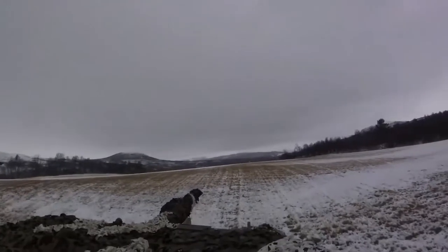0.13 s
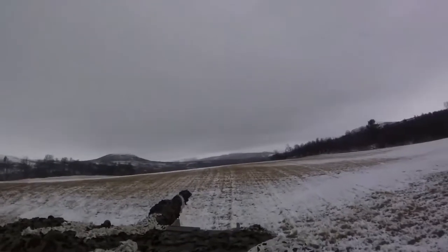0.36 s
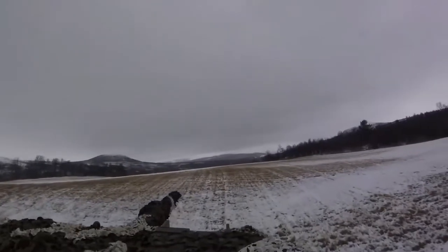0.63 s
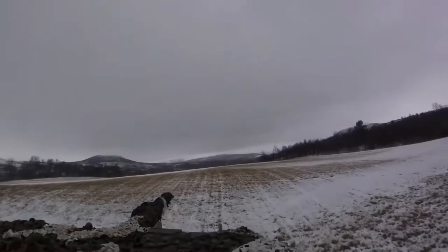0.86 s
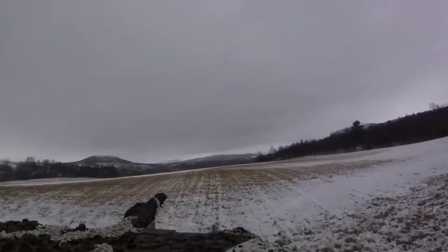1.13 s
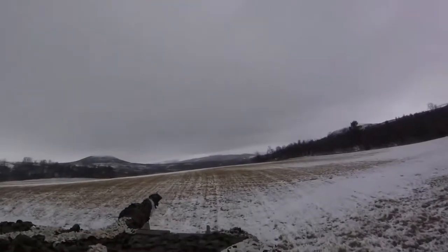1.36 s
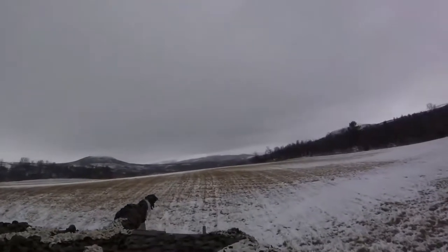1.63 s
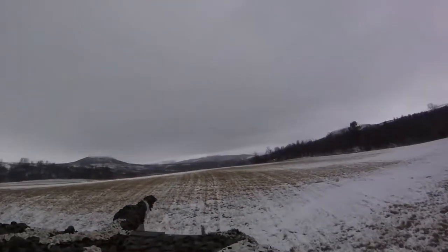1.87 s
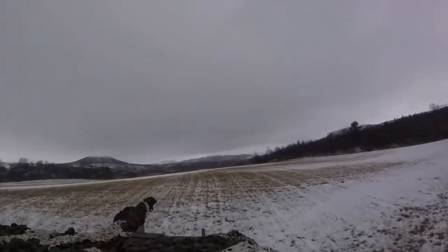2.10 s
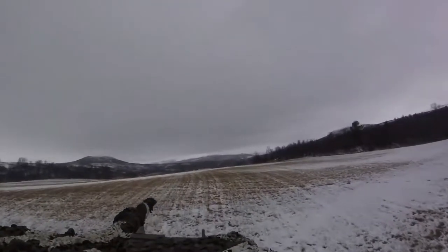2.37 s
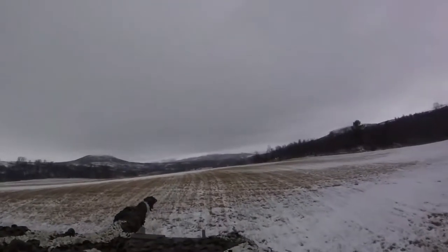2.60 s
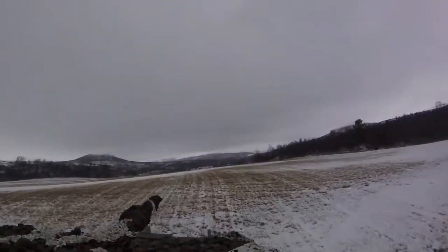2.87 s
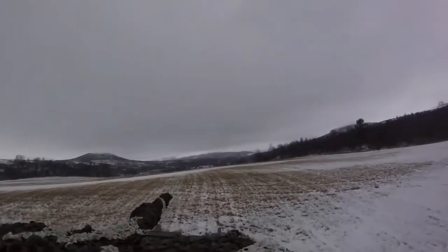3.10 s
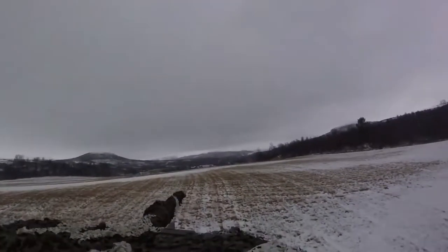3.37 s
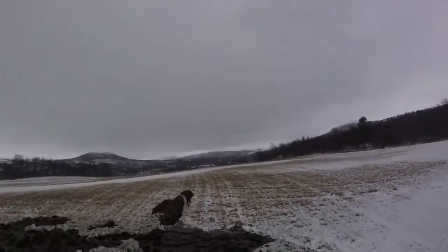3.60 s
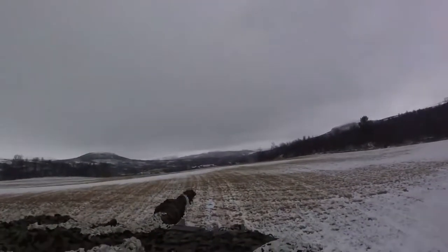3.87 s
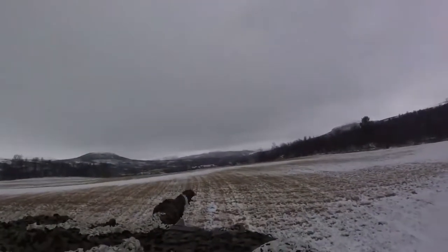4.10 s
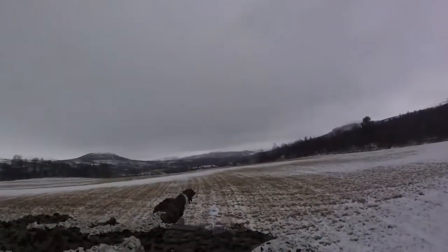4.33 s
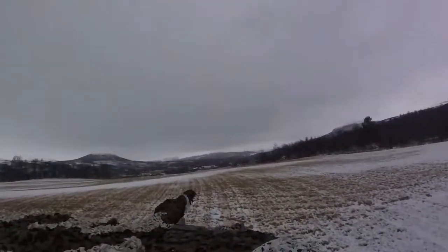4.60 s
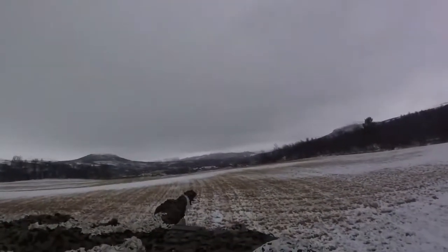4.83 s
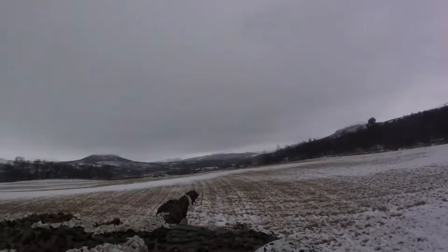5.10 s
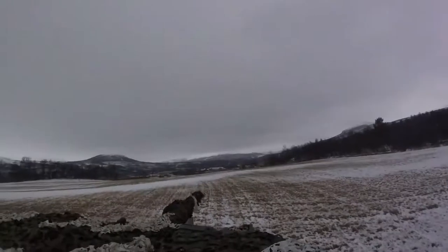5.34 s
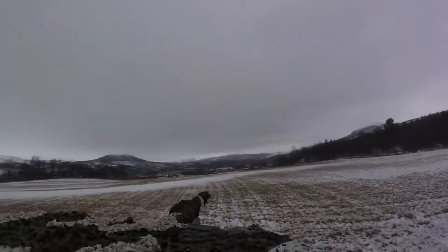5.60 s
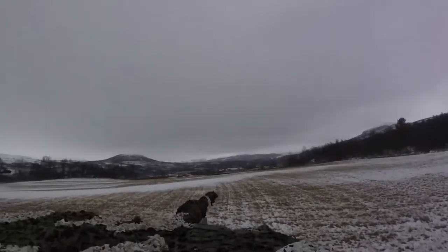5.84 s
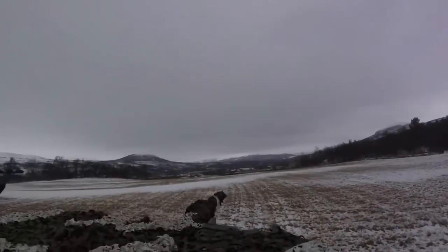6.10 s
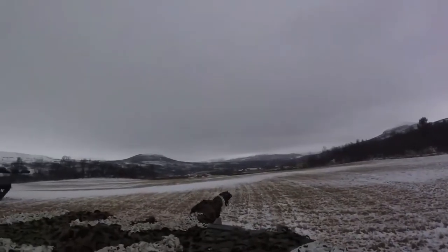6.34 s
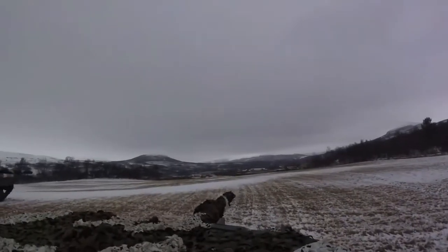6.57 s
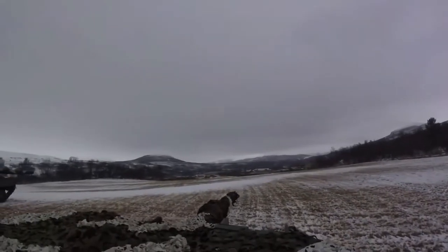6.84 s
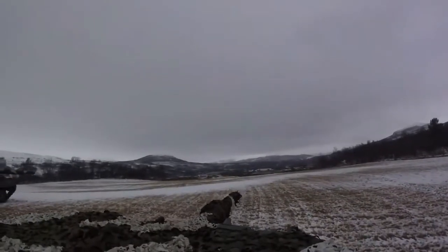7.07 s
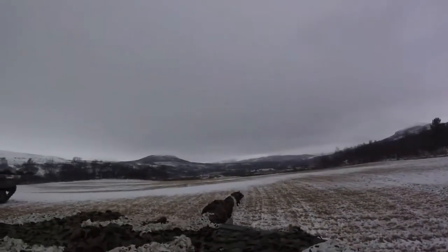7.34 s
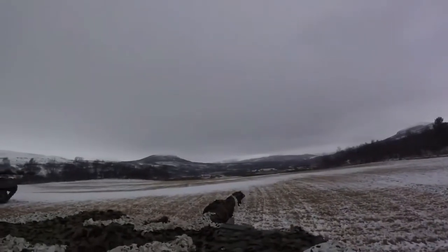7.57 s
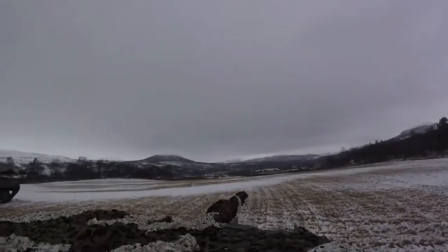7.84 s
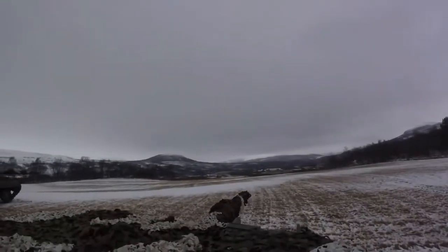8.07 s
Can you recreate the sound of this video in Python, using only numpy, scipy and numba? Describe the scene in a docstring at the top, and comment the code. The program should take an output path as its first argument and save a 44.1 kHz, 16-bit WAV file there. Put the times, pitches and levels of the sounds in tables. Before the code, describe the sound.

Heavy tracked vehicles with big diesels growl across a snowy field, engines revving and sinking, exhaust puffing, tracks rumbling, rattling and clanking.

```python
"""Tracked vehicles manoeuvring

Three tracked vehicles with six-cylinder diesels manoeuvre on a field, heard at one microphone.
Their firing tones are sines that glide and beat; the near engine puffs shaped noise at each firing under throttle.
Tracks rumble, roar and rattle as coloured noise, with clanks as noise bursts and thuds as damped sines.
Gears, rings and a turbocharger are wavering tones. A gain control and a limiter steady the level."""
import sys
import numpy as np
from scipy import signal
from scipy.fft import rfft, irfft, next_fast_len
from scipy.io import wavfile
from scipy.ndimage import uniform_filter1d
from numba import njit

SR = 44100
rng = np.random.default_rng(int(sys.argv[2]) if len(sys.argv) > 2 else 0)


def gain_from_db(level_db):
    """Convert decibel levels to linear amplitude factors (20 dB per decade)."""
    decades = np.asarray(level_db, float) / 20
    return 10 ** decades


def generate_wav(signal):
    """Clip the signal to [-1, 1] and save it as 16-bit WAV at the path in sys.argv[1]."""
    frames = np.transpose(np.atleast_2d(signal))
    scaled = np.clip(frames, -1, 1) * 32767
    pcm = np.round(scaled).astype(np.int16)
    wavfile.write(sys.argv[1], SR, pcm)


N = 361617  # samples, 8.2 s
STEP = 16  # engines hold only low tones: made at every 16th sample

# All levels are ahead of the gain control.
# Tracks on the ground. Each row: time in seconds, then work of the links, shaking of the hulls
# and grit under the links, all in dB about their means.
TRACK_WORK = [(0.0, 3, 3.5, 1), (0.3, 0, 0, 3), (0.65, -1, 0, 0), (1.0, 3, -2.5, -1.5), (1.55, 1, 7, -4),
              (2.25, 0.5, -4.5, 2), (2.6, -4, 0, 1.5), (3.05, -4.5, 0.5, -1.5), (3.55, -2, 0.5, -1),
              (3.9, 0, 3, 1), (4.4, 2, 3.5, -1), (5.1, 0, 1, 1.5), (6.0, -0.5, -0.5, -0.5),
              (6.5, 0, 0.5, 2), (7.0, 2, 1, -3.5), (7.5, 0, 3, -1), (7.9, 1.5, 4, -5.5), (8.2, 1, 3, -1)]
# Spectra of the track layers. Each row: frequency in Hz, relative density in dB per Hz.
RUMBLE_SPECTRUM = [(12, -35), (22, -12), (35, -4), (50, -1), (72, 0), (95, -2), (120, -10), (160, -30),
                   (260, -60)]
GRUMBLE_SPECTRUM = [(60, -41), (110, 7.5), (150, 5), (220, 3.5), (280, -3.5), (350, -13), (480, -31),
                    (700, -62.5)]
ROAR_SPECTRUM = [(190, -28.5), (330, -1), (387, -3.5), (527, -7), (556, -8.5), (606, -6.5), (647, -7.5),
                 (749, -8), (937, -15), (1300, -12.5), (1600, -20.5), (2080, -51.5), (3520, -120)]
GRIT_SPECTRUM = [(940, -30), (1600, -1.5), (1760, -1), (1960, -2.5), (2300, -7.5), (2820, -7.5),
                 (3900, -19.5), (5070, -52), (8580, -120)]
RATTLE_SPECTRUM = [(3000, -30), (3700, -8), (4450, -7), (4900, -1), (5250, 1), (5850, -8), (6550, -3),
                   (7300, -7), (8600, -8), (9600, -13), (11000, -22), (12000, -29), (14000, -34),
                   (15000, -50)]  # treble as coloured by the camera's housing
# Edges of the bands that swell alone, in Hz: for the treble noises, then for the grit.
PATCH_EDGES_HZ = [0, 4400, 5900, 7000, 8000, 9200, 23000]
GRIT_EDGES_HZ = [0, 1150, 1450, 1800, 2250, 2800, 3400, 23000]
RUMBLE_DB, GRUMBLE_DB, ROAR_DB, GRIT_DB, RATTLE_DB = -31.5, -33.5, -42, -54, -63  # at mean work
ROAR_SHARE, GRIT_SHARE, RATTLE_SHARE = 0.82, 1.16, 0.9  # dB for each dB of work
RUMBLE_SHARE = 0.93  # dB for each dB of shaking

# Louder knocks of the links; the last three rows are soft, longer swells of treble noise.
# Each row: start in seconds, level in dB ahead of the envelope, decay constant in seconds.
CLANKS = [(2.629, -67, 0.0083), (2.774, -54.5, 0.0089), (2.97, -53.5, .004), (3.07, -62, .006),
          (3.147, -60, .006), (3.181, -56, 0.0045), (3.232, -59.5, .015), (3.346, -54, .006),
          (3.422, -60, .005), (3.742, -56, 0.015), (3.974, -56, .008), (4.455, -57, .03),
          (4.478, -55, .014), (4.587, -58, .012), (4.716, -53, .008), (4.778, -53, 0.014),
          (4.795, -56.5, .016), (4.893, -53.5, .005), (4.913, -59, .012), (5.4816, -63, .012),
          (5.78, -53.5, .008), (6.139, -59, 0.0067), (6.27, -58.5, 0.013), (6.387, -56, .008),
          (7.164, -61, .014), (7.72, -60.5, .04), (7.78, -64, .04), (7.87, -62, .04)]
# Dull knocks as a hull jolts. Each row: start in seconds, level in dB ahead of onset and decay, pitch in Hz.
THUDS = [(3.32, -29, 382), (3.761, -22, 149.8), (3.955, -22, 292), (4.12, -13.5, 146), (4.615, -33, 522.5),
         (4.62, -40, 941), (4.919, -22, 145), (5.699, -15, 164.4), (7.62, -18, 114.1), (7.88, -16.5, 172),
         (7.93, -17.5, 134.7), (8.08, -24, 111)]
THUD_T60_S = 0.13

# Wavering tones: rings of hull, plate and links, the turbocharger, then three gear whines.
# Each row: time in seconds, mean pitch in Hz, level in dB ahead of flicker.
HULL_RING = [(4.1, 743.4, -70), (4.6, 761.4, -52), (5.2, 754, -70), (6.2, 747.8, -60.5), (7, 753, -56),
             (7.9, 756, -53.5), (8.2, 744, -65)]
PLATE_RING = [(6.0, 1290, -71), (6.4, 1295, -57), (6.7, 1310, -56), (7.1, 1298, -62), (7.5, 1313, -58.5),
              (8.2, 1290, -63)]
LINK_RING = [(2.9, 2770, -72), (3.3, 2766, -72.5), (8.2, 2753, -70)]
TURBO = [(1.3, 7303, -72), (1.7, 7670, -71), (2, 7900, -66), (2.3, 8270, -67), (2.5, 8420, -84),
         (2.75, 8350, -79), (2.95, 8100, -77.5), (3.2, 7900, -78.5), (3.4, 7570, -77), (3.55, 7300, -83)]
WHINE = [(3.0, 568.5, -57), (3.8, 557.3, -58), (4.2, 568.7, -47.5), (4.6, 588, -52), (5.1, 595, -64),
         (5.4, 599, -56), (5.8, 600.6, -51), (6.6, 598.2, -51), (7.0, 612, -52.5), (8.2, 613.2, -51.5)]
RISING_WHINE = [(4.8, 824, -59), (5.3, 851.7, -57), (5.7, 880, -57), (6.2, 896.5, -56), (6.35, 902, -70)]
LATE_WHINE = [(6.7, 1102, -66), (6.95, 1115, -59), (7.3, 1122, -58), (7.55, 1115, -60), (8.2, 1110, -61)]

# Engine glides. Each row: time in seconds, firing rate in Hz, firing tone in dB ahead of roughness.
FAR = [(0.0, 102.1, -28), (0.38, 101.8, -27.5), (0.75, 98.85, -25.5), (1.12, 92.5, -32), (1.5, 92.2, -33.5),
       (2.71, 73.45, -39.5), (3.11, 81.1, -43), (3.32, 85.33, -33.5), (3.52, 84.7, -28.5),
       (3.93, 87.45, -27), (4.54, 94.3, -26.5), (5.2, 100.5, -24.5), (6.3, 101.6, -24), (6.57, 99.8, -25),
       (6.78, 93.7, -29), (7.39, 82.58, -26), (7.79, 71.14, -30), (8.0, 72.4, -22), (8.2, 69.86, -34)]
LEAD = [(0.0, 61.7, -36), (0.2, 55.95, -38), (0.6, 51.75, -30), (0.8, 57.1, -24), (1.0, 65.98, -16.5),
        (1.4, 81.2, -22), (1.8, 92, -21.5), (2.4, 101.5, -19), (2.8, 106.6, -20.5), (3.0, 99.44, -19),
        (3.2, 83.86, -28.5), (3.47, 72.9, -30), (3.58, 68.93, -29), (3.7, 60, -43), (3.76, 58.23, -25),
        (3.86, 65.9, -22), (4.0, 57.9, -22.5), (4.2, 57.54, -26), (4.42, 62.33, -21), (4.8, 60.45, -22.5),
        (5.3, 58.72, -22), (5.7, 58.5, -21), (6.0, 57.3, -21.5), (6.27, 53.2, -22.5), (6.55, 52.6, -24.5),
        (6.8, 52.53, -21.5), (7.05, 54.3, -22), (7.4, 53.4, -21.5), (7.6, 52.63, -23.5), (7.8, 49.08, -24),
        (8.2, 54.3, -20)]
NEAR = [(0.0, 65.2, -25.5), (0.2, 66.15, -24), (0.39, 78.24, -22), (0.59, 81.6, -20.5), (0.79, 69.76, -28),
        (0.98, 64.5, -30), (1.18, 71.5, -33.5), (1.37, 73.5, -22.5), (1.6, 80.7, -30), (1.8, 86.5, -27),
        (1.96, 89.13, -30), (2.13, 91.47, -25), (2.36, 93.4, -25), (2.55, 89.53, -34.5), (2.75, 84, -49)]
# Exhaust bark of each engine. Each row: multiple of the six-firing cycle, relative level in dB.
FAR_BARK = [(8, -11.5), (9, -6), (11, -16), (12, -4.5), (14, -17.5), (15, -17), (20, -15.5)]
LEAD_BARK = [(8, -13), (9, -7.5), (11, -16), (12, -1.5), (14, -13), (15, -5.5), (18, -24.5), (20, -14),
             (21, -23), (22, -22), (26, -24)]
NEAR_BARK = [(8, -9.5), (9, -1.5), (12, 3), (14, -12.5), (15, 1.5), (18, -11), (20, -18)]
# Exhaust resonances. Each row: centre in Hz, width in Hz, boost in dB.
PIPE = [(238, 23, 7), (344, 63, 4)]
BARK_DB_PER_HZ, CRUISE_HZ = 0.1486, 77.8  # the bark grows with firing rate
# Coasting, from and to in seconds: the bark may drop quickly; the half-rate tone changes later,
# by each engine's amounts.
FAR_COASTS, LEAD_COASTS, NEAR_COASTS = (7.15, 7.68), (2.956, 3.67), (0.49, 0.67)
COAST_FADE_S, HALF_LAG_S = 0.17, 0.21

# Near engine's throttle. Each row: opens in seconds, shuts in seconds, gas roar in dB ahead of build-up,
# fade after shutting in dB per second.
THROTTLE = [(-0.3, 0.153, -45.5, 41), (0.198, 0.513, -39.5, 111), (0.9, 1.239, -45.5, 50.5),
            (1.406, 2.284, -41, 23)]
# Spectra of the exhaust gas. Each row: frequency in Hz, relative density in dB per Hz.
GAS_ROAR_SPECTRUM = [(220, 1.5), (380, 0), (625, 1.5), (682, -6.5), (766, 0.5), (887, -15.5), (1610, -26),
                     (1930, -22), (3900, -30), (5070, -62.5), (8580, -120)]
GAS_HISS_SPECTRUM = [(3000, -30), (3700, -8), (4450, -9), (4900, -2), (5250, 1), (5850, -9), (6200, -5),
                     (6450, -1), (6800, -4), (7200, -8), (8600, -11), (9800, -18), (11300, -36),
                     (12500, -42), (14000, -42), (15000, -50)]
OPEN_S, BUILD_DB_PER_S = 0.051, 6  # opening time; pressure builds while open
GAS_HISS_DB, HISS_FADE_MORE_DB_PER_S = -16.5, 27.5  # hiss against roar

HOLD_DB, RATIO, ATTACK_S, RELEASE_S = -17.5, 1.39, 0.022, 0.018  # gain control
CEILING_DB, CEILING_RATIO, CEILING_ATTACK_S, CEILING_RELEASE_S = -14, 2.5, 0.003, 0.035  # quick limiter


def noise():
    """White noise at rms 1."""
    return rng.standard_normal(N)


def walk(rate, step=1):
    """Random levels held 1 / rate s and slewed twice, at every step-th sample; spread near 1."""
    hold = int(SR / STEP / rate)
    held = np.repeat(rng.standard_normal(N // STEP // hold + 2), hold)
    slow = uniform_filter1d(uniform_filter1d(held, hold), hold)
    return np.repeat(1.312 * slow, STEP // step)[:-(-N // step)]


def curves(table):
    """Columns of a table, glided to every sample."""
    s, *columns = np.transpose(table)
    return [np.interp(np.arange(N) / SR, s, column) for column in columns]


def ends(table, fade_s=0.15):
    """Fades in ahead of the first row and out after the last."""
    t = np.arange(N) / SR
    inside_s = np.minimum(t - table[0][0], table[-1][0] - t)
    return np.clip(1 + inside_s / fade_s, 0, 1)


def colour(x, spectrum):
    """Filters x by the spectrum and brings it to rms 1."""
    hz, db = np.transpose(spectrum)
    size = next_fast_len(N)
    f = np.arange(size // 2 + 1) * SR / size + 1
    gain = gain_from_db(np.interp(np.log(f), np.log(hz), db, left=-200, right=-200))
    y = irfft(rfft(x, size) * gain, size)[:N]
    return y / np.std(y)


def patchy(x, edges, patchy_db, rate):
    """Each band swells and sinks alone."""
    size = next_fast_len(N)
    spectrum = rfft(x, size)
    band = np.digitize(np.arange(size // 2 + 1) * SR / size, edges)
    out = np.zeros(N)
    for k in range(1, len(edges)):
        out += gain_from_db(patchy_db * walk(rate)) * irfft(spectrum * (band == k), size)[:N]
    return out


def tone(table, waver_hz, rate, flicker_db, octave_db=-40):
    """A tone whose pitch and level waver; quick wide wavering makes it a narrow hiss."""
    hz, db = curves(table)
    phase = 2 * np.pi * np.cumsum(hz + waver_hz * walk(rate)) / SR
    wave = np.sin(phase) + gain_from_db(octave_db) * np.sin(2 * phase)
    return np.sqrt(2) * gain_from_db(db + flicker_db * walk(rate)) * wave * ends(table)


def tracks():
    """Ground and hulls rumble as low noise; links roar and rattle in bursts, with random strikes among them."""
    work_db, shaking_db, grit_db = curves(TRACK_WORK)
    shake = walk(11)
    # about 300 strikes a second, of widely spread size, each a short decaying burst
    strikes = (rng.random(N) < 300 / SR) * gain_from_db(1.4 * rng.exponential(size=N)) * noise()
    burst = np.exp(-np.arange(200) / 45) * rng.standard_normal(200)
    clicks = signal.fftconvolve(strikes, burst, "same")
    clicks /= np.std(clicks)

    rumble = colour(gain_from_db(0.6 * walk(3.8)) * noise(), RUMBLE_SPECTRUM)
    grumble = colour(gain_from_db(1.2 * walk(9)) * noise(), GRUMBLE_SPECTRUM)
    roar = colour(gain_from_db(0.13 * shake + 0.45 * walk(25)) * noise(), ROAR_SPECTRUM)
    grit = colour(gain_from_db(0.5 * shake + 0.7 * walk(13)) * noise() + 0.3 * clicks, GRIT_SPECTRUM)
    grit = patchy(grit, GRIT_EDGES_HZ, patchy_db=1.5, rate=6)
    rattle = colour(gain_from_db(shake + 0.7 * walk(40)) * noise() + 0.089 * clicks, RATTLE_SPECTRUM)
    rattle = patchy(rattle, PATCH_EDGES_HZ, patchy_db=1.13, rate=9)

    out = gain_from_db(RUMBLE_DB + RUMBLE_SHARE * shaking_db) * rumble
    out += gain_from_db(GRUMBLE_DB + shaking_db) * grumble
    out += gain_from_db(ROAR_DB + ROAR_SHARE * work_db) * roar
    out += gain_from_db(GRIT_DB + GRIT_SHARE * work_db + grit_db) * grit
    return out + gain_from_db(RATTLE_DB + RATTLE_SHARE * work_db) * rattle


def clanks():
    """Knocks of the links and soft late swells: decaying noise with the rattle's colour and some body below."""
    body = colour(noise(), [(800, -29), (1800, -3.5), (3500, 3.5), (5000, -34)])
    clang = colour(noise(), RATTLE_SPECTRUM) + body
    # even out the noise, so that each burst follows its row
    clang /= np.sqrt(uniform_filter1d(clang ** 2, size=90) / 2 + 1e-9)
    u, shape = np.arange(8000) / SR, np.zeros(N)
    for s, db, decay_s in CLANKS:
        i = int(s * SR)
        envelope = gain_from_db(db) * np.minimum(u / 0.003, 1) * np.exp(-u / decay_s)
        shape[i:i + 8000] += envelope[:N - i]
    return shape * clang


def thuds():
    """Each jolt of a hull rings one damped mode after a soft onset."""
    out, u = np.zeros(N + SR), np.arange(SR // 2) / SR
    for s, db, hz in THUDS:
        onset = (1 - np.exp(-u / 0.0022)) ** 2
        ring = gain_from_db(db - 60 * u / THUD_T60_S) * onset * np.sin(2 * np.pi * hz * u)
        out[int(s * SR):][:len(u)] += ring
    return out[:N]


def rings():
    """Hull, plate and links ring as tones of wavering pitch and level."""
    hull = tone(HULL_RING, 9.05, 25, 3.1)
    plate = tone(PLATE_RING, 14, 30, 2.5)
    links = tone(LINK_RING, 60, 150, 2.7)
    return hull + plate + links


def turbocharger():
    """A breathy whistle: quick, wide pitch wavering spreads the tone into a narrow hiss."""
    return tone(TURBO, 180, 300, 2.6)


def gears():
    """Three thin gear tones, the first with a stronger octave above."""
    first = tone(WHINE, 1.2, 10, 0.81, octave_db=-12.5)
    rising = tone(RISING_WHINE, 1.5, 11, 1.2)
    late = tone(LATE_WHINE, 2.5, 10, 1.8)
    return first + rising + late


def turns(table):
    """Phase in six-firing cycles, summed from the firing rate."""
    return np.cumsum(curves(table)[0]) / SR / 6


def engine(table, bark, rough_db, wobble_rad, coasts, half_db, half_coast_db, bark_db, hush_db, dulls_db_per_s=0):
    """Multiples of the cycle; uneven firing makes each waver; a pipe turning away dulls the higher ones."""
    hz, firing_db = (c[::STEP] for c in curves(table))
    t = np.arange(len(hz)) * STEP / SR

    def span(start, stop):
        """Is 1 between start and stop, with a fade at either side."""
        return np.clip(1 + np.minimum(t - start, stop - t) / COAST_FADE_S, 0, 1)

    late_coast = span(coasts[0] + HALF_LAG_S, coasts[1])
    half_db = half_db + half_coast_db * late_coast
    bark_db = firing_db + bark_db + BARK_DB_PER_HZ * (hz - CRUISE_HZ) - hush_db * span(*coasts)
    cycle = 2 * np.pi * turns(table)[::STEP]
    out = gain_from_db(firing_db + rough_db * walk(9, STEP)) * np.sin(6 * cycle)
    # tone at half the firing rate, its level steadier late in the coasting
    half_waver_db = (1 - 0.7 * late_coast) * 4 * walk(5, STEP)
    out += gain_from_db(half_db + half_waver_db) * np.sin(3 * cycle + rng.uniform(0, 2 * np.pi))
    for order, db in bark:
        f = hz * order / 6
        pipe_db = sum(top / (1 + (2 * (f - centre) / width) ** 2) for centre, width, top in PIPE)
        pipe_db -= dulls_db_per_s * t * max(order / 3 - 3, 0)
        wobble = wobble_rad * walk(7, STEP) + rng.uniform(0, 2 * np.pi)
        level = gain_from_db(bark_db + db + pipe_db + 4.1 * rough_db * walk(6, STEP))
        out += level * np.sin(order * cycle + wobble)
    return np.sqrt(2) * signal.resample_poly(out, STEP, 1)[:N] * ends(table)


def throttle(more_db_per_s):
    """Gas level: opens quickly, builds while held, dies away after shutting."""
    t, out = np.arange(0, N, STEP) / SR, 0
    for opens, shuts, db, fade in THROTTLE:
        held = np.clip(t, opens, shuts) - opens
        fall_db = (fade + more_db_per_s) * np.maximum(t - shuts, 0)
        out = out + gain_from_db(db + BUILD_DB_PER_S * held - fall_db) * np.clip(held / OPEN_S, 0, 1)
    return np.repeat(out, STEP)[:N]


def gas():
    """A puff of noise at each firing of the near engine, every other one stronger, sizes scattered."""
    firing = 6 * turns(NEAR)
    k = firing.astype(int)
    count = k.max() + 1
    size_db = 3.3 * rng.standard_normal(count) - 7.9 * (np.arange(count) % 2)
    puff = gain_from_db(size_db[k]) * np.sin(np.pi * (firing % 1)) ** 2
    # steady flow under the puffs
    roar = colour((0.75 + puff) * noise(), GAS_ROAR_SPECTRUM)
    hiss = colour((0.59 + puff) * noise(), GAS_HISS_SPECTRUM)
    hiss = patchy(hiss, PATCH_EDGES_HZ, patchy_db=2, rate=22)
    return throttle(0) * roar + gain_from_db(GAS_HISS_DB) * throttle(HISS_FADE_MORE_DB_PER_S) * hiss


def scene():
    """All vehicles at one microphone."""
    ground = tracks() + clanks() + thuds()
    tones = rings() + turbocharger() + gears()
    far = engine(FAR, FAR_BARK, 0.5, 0.5, FAR_COASTS, half_db=-38, half_coast_db=11, bark_db=-15, hush_db=0)
    lead = engine(LEAD, LEAD_BARK, 0.37, 0.11, LEAD_COASTS, half_db=-41.5, half_coast_db=18, bark_db=-12,
                  hush_db=11)
    near = engine(NEAR, NEAR_BARK, 0.68, 0.25, NEAR_COASTS, half_db=-44.5, half_coast_db=-2, bark_db=-5.5,
                  hush_db=7, dulls_db_per_s=3)
    return (ground + tones + far + lead + near + gas())[None]


@njit
def follow(x, attack, release, level):
    """Level of x, with one smoothing share for rises and another for falls."""
    out = np.empty(len(x))
    for i in range(len(x)):
        a = abs(x[i])
        level += (a - level) * (attack if a > level else release)
        out[i] = level
    return out


def gain_control(x):
    """Pulls the level part of the way toward a set point, up or down."""
    level = follow(x[0], 1 / (ATTACK_S * SR), 1 / (RELEASE_S * SR), gain_from_db(HOLD_DB))
    level = uniform_filter1d(uniform_filter1d(level, size=300), size=300)
    return x * (gain_from_db(HOLD_DB) / level) ** (1 - 1 / RATIO)


def limiter(x):
    """Turns down only the swells above the ceiling."""
    peak = follow(x[0], 1 / (CEILING_ATTACK_S * SR), 1 / (CEILING_RELEASE_S * SR), gain_from_db(CEILING_DB))
    peak = uniform_filter1d(peak, size=200)
    return x * np.minimum(gain_from_db(CEILING_DB) / peak, 1) ** (1 - 1 / CEILING_RATIO)


def low_pass(x):
    """Removes everything above the highest recorded frequency."""
    return signal.sosfilt(signal.butter(12, 14600, fs=SR, output="sos"), x)


def record(dry):
    """Gain control steadies the level, a limiter caps the swells and the loudest peaks are rounded."""
    steadied = limiter(gain_control(dry))
    rounded = np.tanh(1.5 * steadied) / 1.5
    return low_pass(rounded)


dry = scene()
out = record(dry)
generate_wav(out)
```